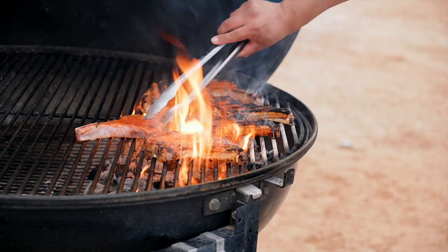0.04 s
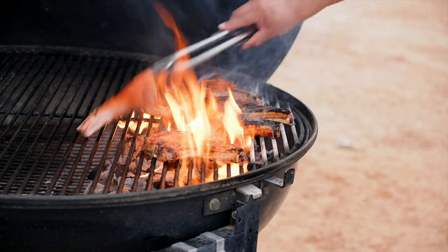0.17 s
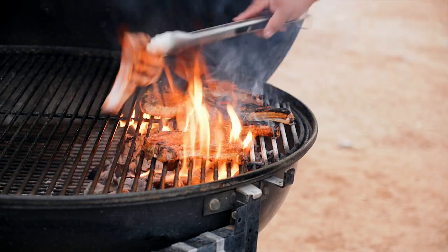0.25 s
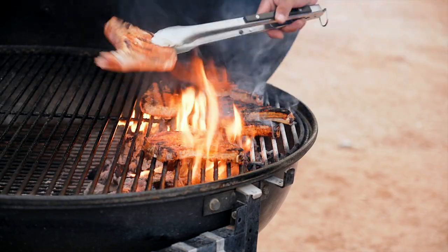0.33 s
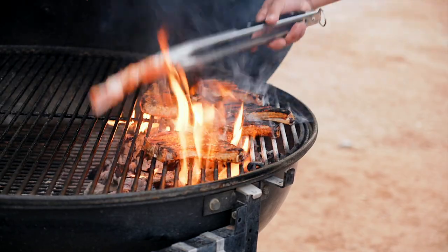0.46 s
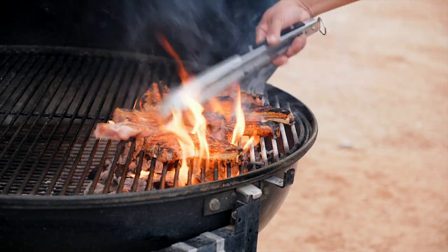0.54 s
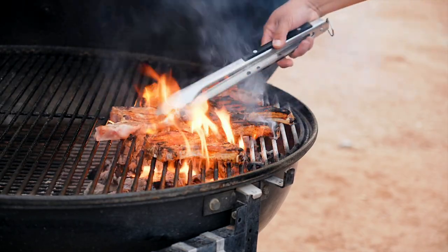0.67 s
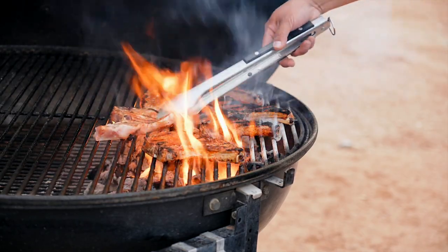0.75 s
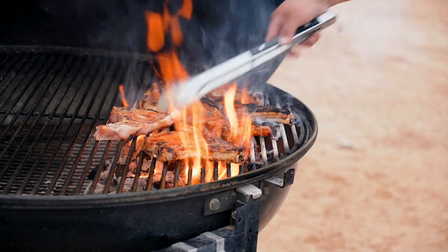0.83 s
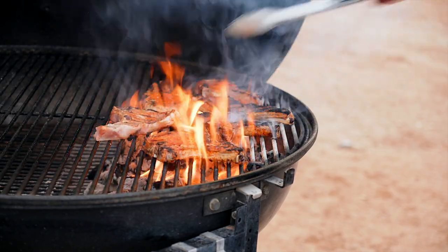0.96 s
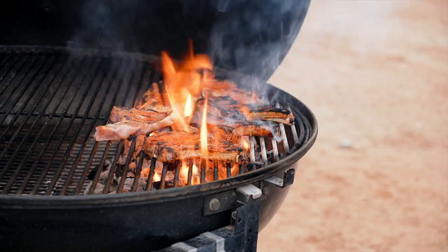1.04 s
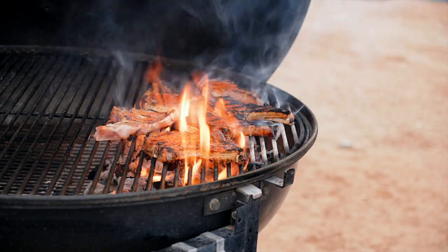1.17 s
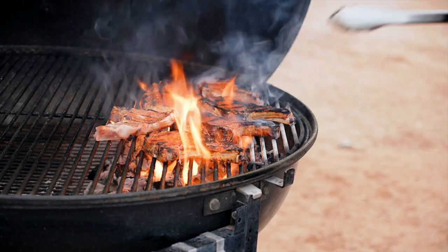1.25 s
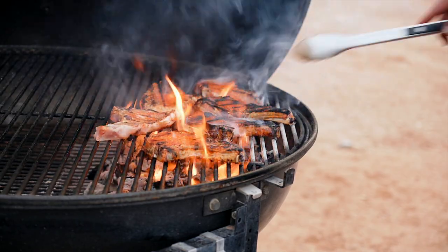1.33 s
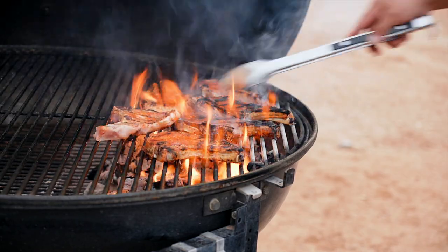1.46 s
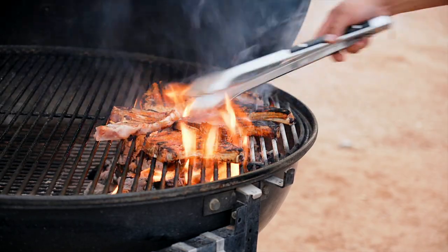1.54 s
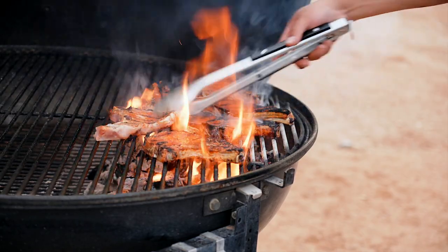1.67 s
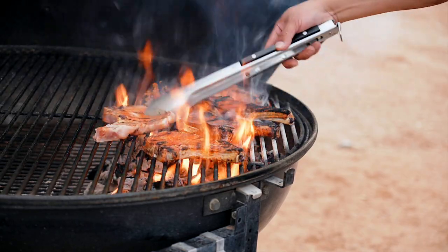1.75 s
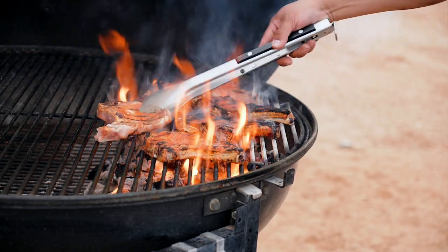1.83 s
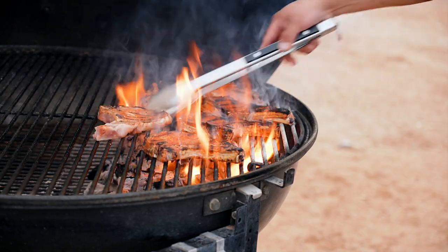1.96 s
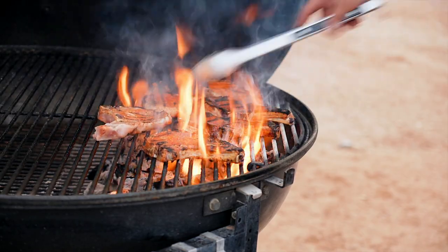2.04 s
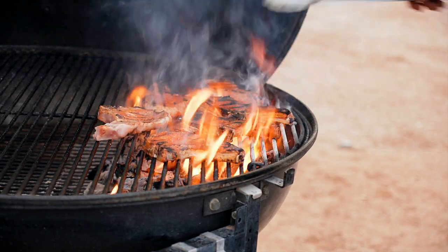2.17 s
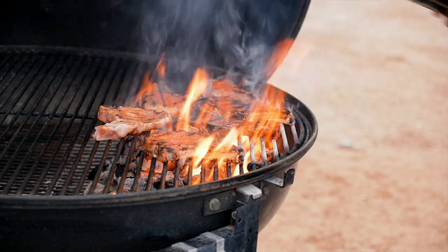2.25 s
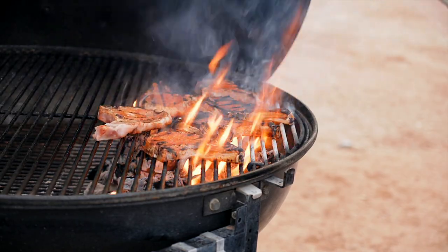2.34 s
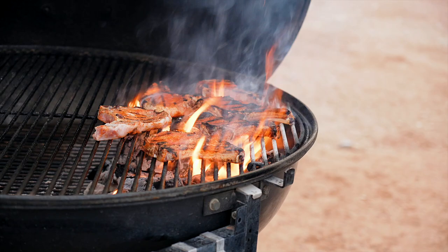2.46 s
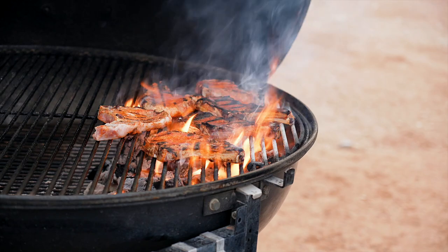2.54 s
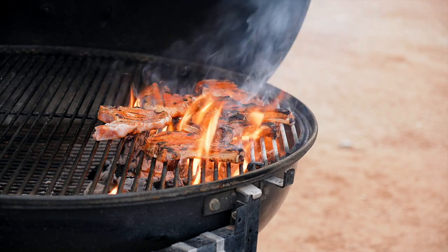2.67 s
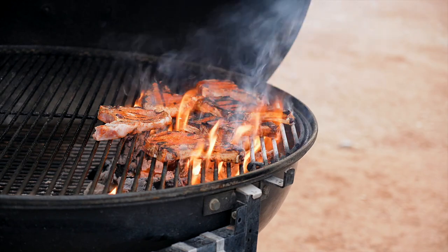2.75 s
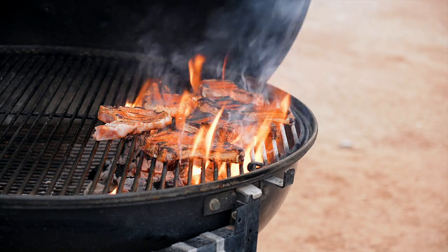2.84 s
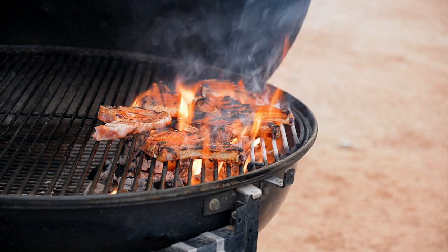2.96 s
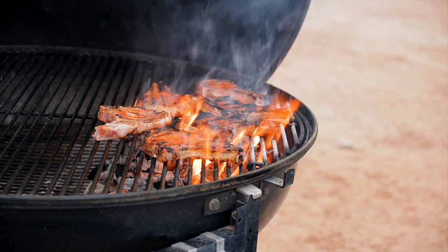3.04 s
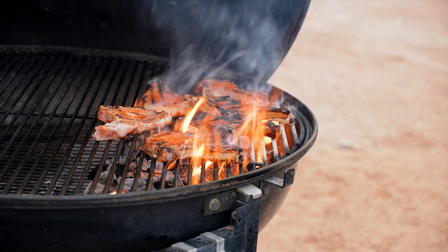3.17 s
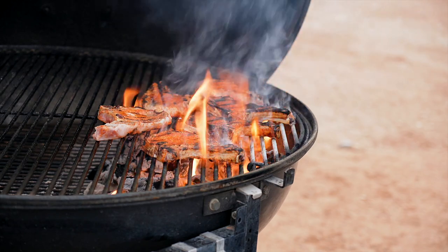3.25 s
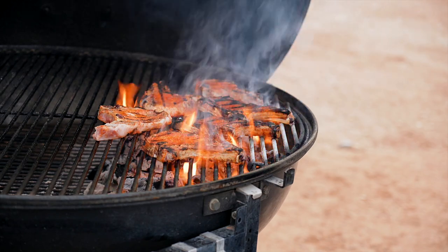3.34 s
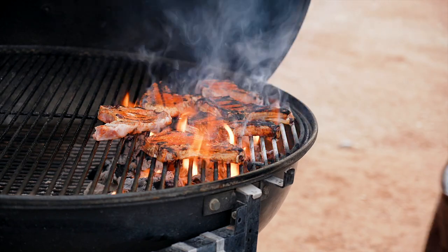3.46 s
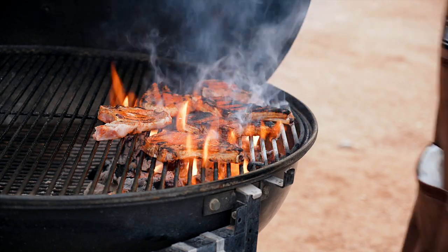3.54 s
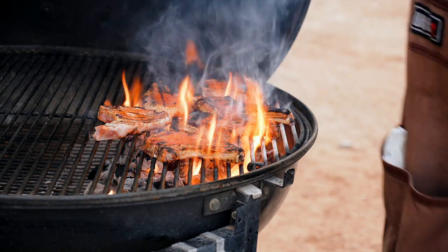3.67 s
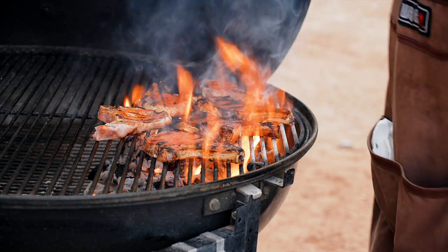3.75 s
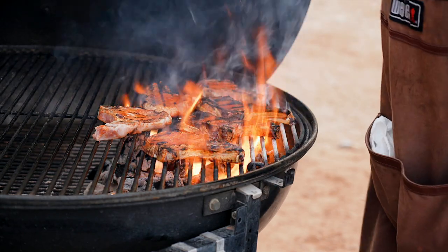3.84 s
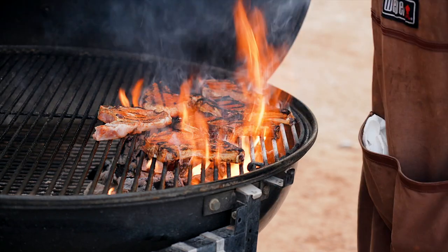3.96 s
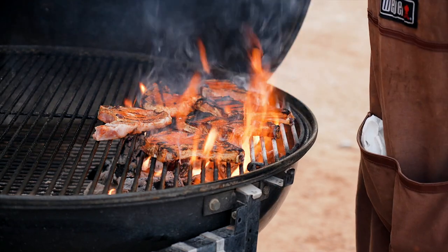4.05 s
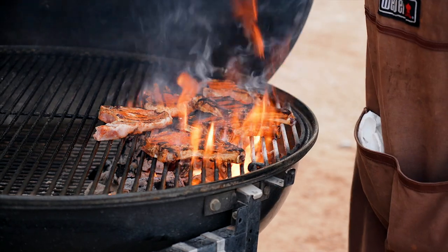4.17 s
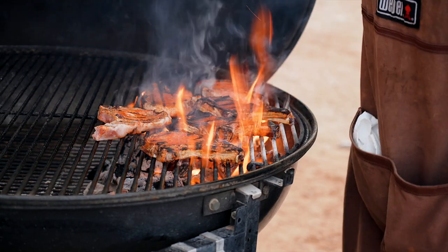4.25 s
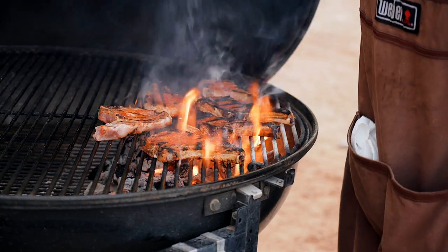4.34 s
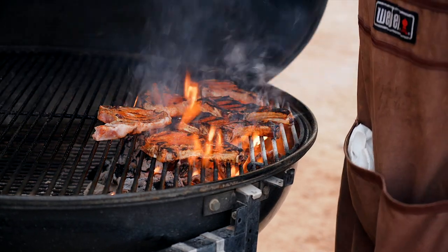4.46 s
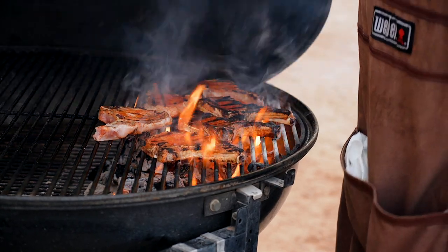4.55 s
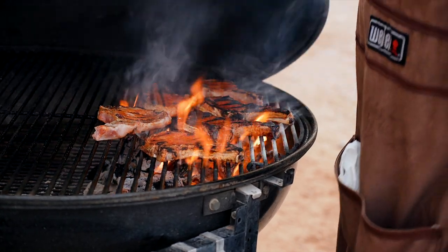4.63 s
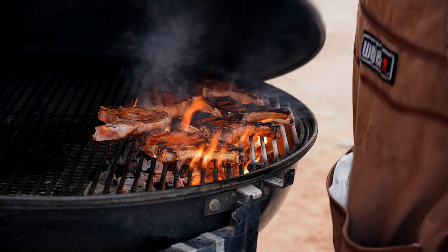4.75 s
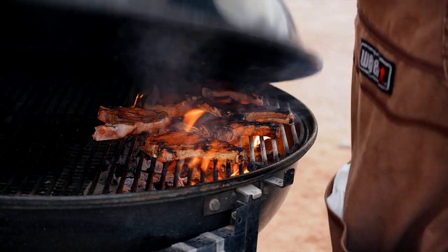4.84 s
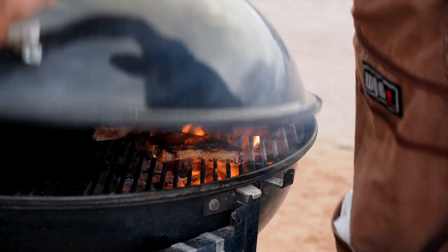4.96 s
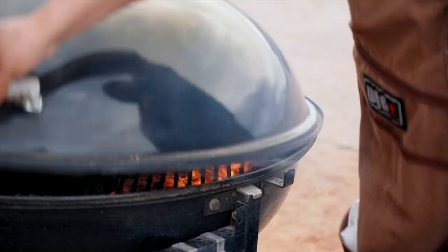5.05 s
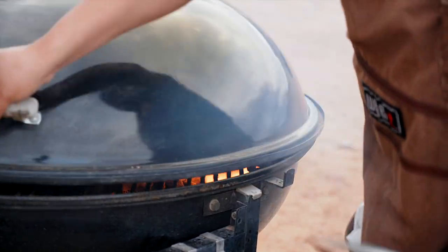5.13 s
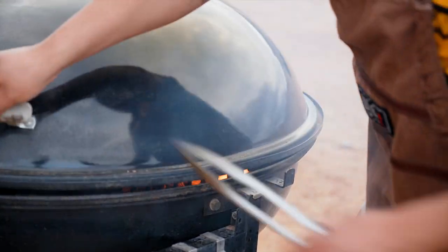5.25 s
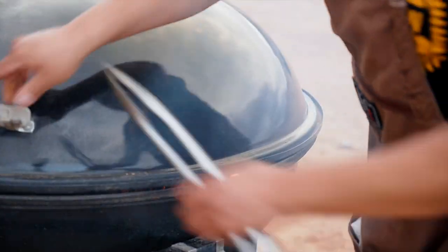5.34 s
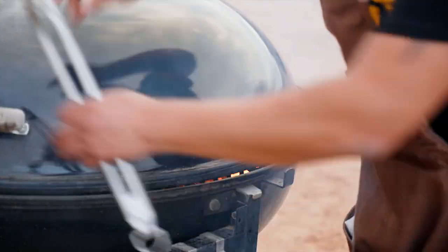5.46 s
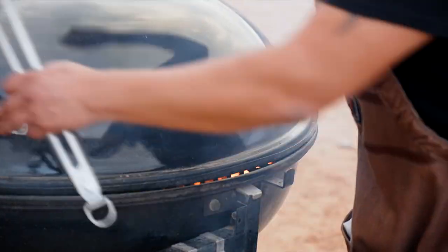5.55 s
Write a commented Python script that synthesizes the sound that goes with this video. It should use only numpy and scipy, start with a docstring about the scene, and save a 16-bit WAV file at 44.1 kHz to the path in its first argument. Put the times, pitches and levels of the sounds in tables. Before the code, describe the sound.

Steady bright sizzling outdoors with metal tong clicks and fat pops, ending in a heavy rattling lid clang and dull knocks.

```python
"""Outdoors at a steel kettle grill, one microphone: meat sizzles as flickering noise grains over a duller rustle,
wind presses on the microphone as low noise, and bumps and tongs ring the grate and tongs as struck modes.
Fat spits in short noise bursts. After four seconds knocks and low thumps shake the bowl, then the lid drags
off its rest with a rattling clang of jolts, slips and grit. As it comes down over the meat the sizzle
dies away, and last knocks and thumps sound on the shut bowl. No distances are computed."""
import sys
import numpy as np
from scipy import signal
from scipy.fft import rfft, irfft, next_fast_len
from scipy.io import wavfile
from scipy.ndimage import uniform_filter1d

SR = 44100
rng = np.random.default_rng(int(sys.argv[2]) if len(sys.argv) > 2 else 0)


def materialize(psi):
    """Save the field psi as 16-bit PCM at rate SR to the path in sys.argv[1].

    A 1-D psi becomes a single channel; in a 2-D psi each row is a channel.
    """
    bounded = np.clip(np.atleast_2d(psi).T, -1, 1)
    quanta = np.round(bounded * 32767).astype(np.int16)
    wavfile.write(sys.argv[1], SR, quanta)


N = 246957  # samples, 5.6 s

# Fire over time, sizzle before the lid lowers it: time_s, sizzle_db, rustle_db
FIRE_LEVELS = [(0.0, -45.5, -47), (0.37, -45.5, -48), (0.55, -45.5, -52), (0.79, -43, -46.5),
               (1.07, -43.5, -54), (1.4, -42, -53), (1.8, -43.5, -49), (2.2, -40, -48.5), (2.45, -44, -52),
               (3.1, -45, -53.5), (3.8, -44.5, -46.5), (4.15, -42.5, -49.5), (4.45, -44.5, -44),
               (4.95, -42, -48), (5.09, -42, -46.5), (5.3, -43, -48.5), (5.6, -42, -45.5)]
# Relative spectrum of fizzing fat: frequency_hz, level_db (per Hz)
SIZZLE_SPECTRUM = [(150, -9), (400, -12.5), (1000, -6), (2000, -5), (3300, -3), (5000, -2), (8600, -1),
                   (13500, 0), (16500, -19)]
# Relative spectrum of fire and handling rustle: frequency_hz, level_db (per Hz)
RUSTLE_SPECTRUM = [(70, -19), (120, -3.5), (260, 5), (400, -0.5), (600, 0.5), (1300, -2), (2500, -10),
                   (4000, -14), (7000, -46)]
# Fat bubbles bursting: start_s, snap_level_db, centre_hz
FAT_POPS = [(0.4476, -31, 3740), (0.713, -24.5, 7200), (0.753, -33, 9100), (0.851, -33, 8600),
            (2.119, -24, 8780), (2.6599, -30, 8730), (2.8404, -33, 4490), (3.1085, -31, 7960),
            (3.1335, -29, 6720), (3.1727, -28, 7410), (3.341, -30, 8590), (3.415, -28.5, 7870),
            (3.4822, -28, 8730), (3.5223, -30, 8820), (3.6, -28, 5780), (3.829, -30, 4530),
            (3.9, -26, 7770)]
POP_T60_S, POP_HALF_WIDTH_OCTAVES, SPRAY_OVER_SNAP_DB = 0.0049, 1.4, -8
# The lid comes down over the meat and the sizzle dies away under it
LOWER_S, MUFFLE_DB_PER_S = 4.645, 20

# Wind on the microphone over time: time_s, level_db
WIND_LEVELS = [(0.0, -37.5), (0.2, -41), (0.76, -34.5), (1.57, -40.5), (2.06, -55), (2.24, -40), (2.6, -42),
               (3.01, -48.5), (3.5, -55), (4.0, -50), (4.38, -45), (4.55, -51), (5.3, -52.5), (5.6, -49)]
# Relative spectrum of the wind: frequency_hz, level_db (per Hz)
WIND_SPECTRUM = [(4, -29), (8, 7.5), (18, 5), (30, -7.5), (60, -14), (90, -24.5), (150, -23.5), (260, -75),
                 (400, -80)]

# Bumps on the grate, the narrow ones heard as wavering, nearly pitched hums:
# start_s, level_db, centre_hz, rattle_t60_s, half_width_octaves, ring_db (over the bump)
GRATE_BUMPS = [(.001, -42.5, 490, 0.2, 0.39, -8), (.573, -44, 600, 0.35, 1.6, -12),
               (.604, -35.5, 690, 0.26, 1.75, -6), (.612, -31.5, 633, 0.3, 0.087, -36),
               (.637, -36.5, 624, 0.35, 1.3, -16), (1.104, -44, 1200, .086, .5, -30),
               (1.447, -28, 730, 0.097, 1.05, -27), (1.677, -40.5, 555, 0.18, 0.64, -10),
               (1.678, -34, 1394, 0.075, 0.035, -30), (1.951, -38, 454, .094, 2.2, -5),
               (2.0, -42.5, 676, 0.41, 0.062, -17), (2.069, -38.5, 1200, 0.039, 1.6, -24),
               (2.22, -42.5, 800, .11, 1.3, -13), (2.841, -44.5, 1080, 0.11, 0.39, -36),
               (3.136, -44, 700, 0.14, 1.3, -17), (3.413, -43.5, 321, .27, 0.14, -21)]
# Modes of the grate, relative: pitch_hz, level_db, t60_s
GRATE_MODES = [(350, -11, .25), (385, -9, .25), (470, -7, .25), (532, -4, .3), (550, -1, .3),
               (600, -2, .15), (700, -5, .15), (845, -7, .12), (1012, -9, .25), (1075, -9, .3),
               (1184, -9, .2), (1680, -12, .25)]
# The hoop takes up the bars' motion late: pitch_hz, level_db (relative), rise_s, t60_s
HOOP_MODE = (668, .5, .11, .55)

# Tongs snapping together or on the grate, and one sharp fat pop at 4.06 s:
# start_s, level_db, centre_hz, chatter_t60_s, half_width_octaves, ring_db (over the clink)
CLINKS_AND_POP = [(.109, -33.5, 5330, 0.03, 1.4, -18), (.192, -34, 3350, 0.14, 1.5, -20),
                  (.316, -39.5, 3100, 0.14, 1.8, -13), (.602, -35.5, 2950, 0.11, .6, -15),
                  (.99, -31, 3340, 0.044, 0.88, -12), (1.6705, -35, 2900, 0.099, 0.95, -30),
                  (2.3382, -19, 7000, 0.016, 2.4, -21), (2.3408, -17.5, 6440, 0.032, 1.5, -5),
                  (2.3569, -28, 6350, 0.036, 3.1, -2), (2.3685, -31.5, 6000, 0.048, 1.4, -3),
                  (2.735, -31.5, 4270, 0.09, 0.88, -9), (2.751, -37.5, 4200, 0.055, 0.68, -4),
                  (2.9768, -26.5, 4300, 0.047, 0.92, -23), (4.0605, -22.5, 5000, 0.0065, 0.94, -19),
                  (4.0807, -33, 3600, 0.029, 1.8, -16), (4.1506, -41, 3340, 0.046, 0.48, -10),
                  (4.2659, -28, 3870, 0.092, 0.7, -22), (5.114, -30, 3500, 0.043, 0.62, -21),
                  (5.349, -46.5, 5600, .05, 0.31, -6), (5.372, -45, 5100, 0.028, 0.76, -12)]
# Modes of the tongs, relative: pitch_hz, level_db, t60_s
TONG_MODES = [(1650, -8, .06), (2300, -6, .05), (2900, -8, .05), (3295, -1, .07), (3700, -7, .05),
              (4177, -2, .13), (4800, -6, .05), (5300, -2, .07), (6654, -9, .1), (7343, -8, .08),
              (7750, -5, .04), (8200, -5, .07), (9130, -6, .04), (11800, -12, .05), (13200, -12, .04)]

# Hand and lid knocking the bowl, first open, then shut:
# start_s, level_db, rattle_t60_s, ring_db (over the knock)
BOWL_KNOCKS = [(4.163, -34.5, 0.32, -17.5), (4.193, -41, 0.16, -17), (4.265, -29, 0.18, -13),
               (4.289, -38, 0.11, -32), (4.416, -35.5, 0.18, -14), (4.434, -40, 0.16, -18),
               (4.924, -48, 0.12, -2), (5.112, -24, 0.19, -8.5), (5.141, -32, 0.32, -8),
               (5.433, -45, 0.41, -15), (5.459, -40, 0.33, -8), (5.487, -30.5, 0.27, -18),
               (5.509, -38.5, 0.21, -3.5)]
KNOCK_CENTRE_HZ, KNOCK_HALF_WIDTH_OCTAVES = 696, 1.37
# Modes of the bowl, relative: pitch_hz, level_db, t60_s
BOWL_MODES = [(199, -2, .17), (240, -6, .3), (312, 0, .35), (458, -14, .4), (560, -6, .26), (610, -8, .3),
              (770, 1.5, .4), (826, -8, .3), (947, -9, .3), (1260, -9, .26), (1400, -10, .2),
              (1545, -13, .28), (1669, -9, .23), (1852, -12, .3), (2213, -12, .17), (2649, -7, .25)]

# Low thumps of the whole grill: start_s, level_db, pitch_hz, t60_s
GRILL_THUMPS = [(4.164, -25, 190, 0.052), (4.267, -25.5, 193, 0.02), (4.416, -14, 229.8, .033),
                (4.504, -6, 192, 0.04), (4.539, -8.5, 242, 0.039), (4.579, -26.5, 190, .091),
                (4.789, -42.5, 119, 0.37), (4.923, -43.5, 116, 0.55), (5.115, -13.5, 189, 0.041),
                (5.135, -31, 86.4, 0.15), (5.489, -14, 110, 0.043), (5.51, -23.5, 123, 0.058),
                (5.519, -32.5, 236, 0.4)]

# Lid dragged over its rest: time_s, force_db, grit_db (over the force)
DRAG_FORCE = [(4.505, -8.5, -25), (4.55, -8, -28), (4.569, -9, -20.5), (4.585, -8.5, -17.5),
              (4.625, -10.5, -28.5), (4.871, -30, -31.5), (4.895, -47, -38), (4.92, -78, -6)]
CLATTER_OVER_FORCE_DB, CLANG_OVER_FORCE_DB = -8.0, -10.5
# Relative spectrum of the lid's dense sheet modes: frequency_hz, level_db (per Hz)
CLATTER_SPECTRUM = [(60, -70), (120, -42), (200, -32), (300, -25), (420, -42), (600, 11), (900, -3),
                    (1600, 1.5), (2100, -7.5), (2800, -8.5), (4500, -34), (8000, -64)]
# Relative spectrum of the scraping grit: frequency_hz, level_db (per Hz)
GRIT_SPECTRUM = [(1500, -40), (2800, 0), (5500, -5), (9000, -12), (13000, -15), (16000, -22)]
# Clear modes of the lid, relative: pitch_hz, level_db, t60_s
LID_MODES = [(192, -16, .2), (315, -11, .3), (485, -10, .45), (543, -3, .4), (578, -2, .3),
             (615, -3.5, .45), (646, -4, .65), (665, -1, .55), (683, -2, .4), (717, -3, .4), (792, -8, .35),
             (819, -1.5, .45), (910, -12, .25), (1064, -14, .4), (1123, -12, .5), (1166, -11, .4),
             (1263, -11, .4), (1291, -9, .4), (1323, -7, .35), (1410, -13, .4), (1597, -6, .4),
             (1649, -6, .35), (1885, -12, .4), (2263, -13, .45), (2632, -14, .4), (2767, -15, .35),
             (2860, -17, .25), (3090, -16, .3), (3760, -24, .3), (4190, -25, .3)]
# The lid jolting as it slides off its rest: start_s, level_db, centre_hz
LID_JOLTS = [(4.502, -23, 575), (4.535, -22.5, 940), (4.544, -20, 810), (4.562, -21, 1220),
             (4.582, -15.5, 2000), (4.602, -25, 1250), (4.66, -24, 1400)]
JOLT_T60_S, JOLT_HALF_WIDTH_OCTAVES, JOLT_RING_DB = 0.028, 1.24, 5.5
# The hand steadies the lid and deadens it
GRIP_S, GRIP_DB_PER_S = 4.875, 112
# Tone of the whole lid drag, bass cut and a slight dip near 400 Hz: frequency_hz, gain_db
LID_DRAG_TONE = [(70, -30), (150, 0), (360, 0), (400, -6), (460, 0)]

# Treble colour of the microphone: frequency_hz, gain_db
MICROPHONE_RESPONSE = [(6500, -0.5), (8600, 3), (9600, -0.5), (10600, -6), (12000, -2.5), (13500, -4),
                       (15000, 2)]
RECORDER_EDGE_HZ = 15900


def gain_of(db):
    """Decibels to a factor."""
    return 10 ** (np.asarray(db) / 20)


def evened(x):
    """Scales to rms 1."""
    return x / np.sqrt(np.mean(x ** 2) + 1e-20)


def curve(rows, column, outside_db=None):
    """One column of a table at every sample."""
    rows = np.array(rows)
    return np.interp(np.arange(N) / SR, rows[:, 0], rows[:, column], outside_db, outside_db)


def fall_after(start_s, db_per_s):
    """A steady fall in decibels from a given moment, as a factor."""
    return gain_of(-db_per_s * np.maximum(np.arange(N) / SR - start_s, 0))


def shaped(x, points):
    """Passes x through a (Hz, dB) response, straight over log frequency."""
    size = next_fast_len(len(x))
    point_hz, point_db = np.transpose(points)
    hz = np.fft.rfftfreq(size, 1 / SR)
    response_db = np.interp(np.log(hz + 1), np.log(point_hz + 1), point_db)
    return irfft(rfft(x, size) * gain_of(response_db), size)[:len(x)]


def coloured(x, points):
    """Noise shaped by a relative spectrum, rms 1."""
    return evened(shaped(x, points))


def wander(per_s):
    """Slow random drift of rms 1: noise smoothed twice over 1/per_s seconds."""
    window = int(SR / per_s)
    once = uniform_filter1d(rng.standard_normal(N), window)
    return evened(uniform_filter1d(once, window))


def grains(spread_db, share, most):
    """Noise in which a share of the samples are clicks of very uneven size."""
    sizes = gain_of(spread_db * np.minimum(rng.exponential(1, N), most))
    clicks = sizes * (rng.random(N) < share)
    return rng.standard_normal(N) * (1 + clicks)


def ring(force, modes, late=None):
    """A struck body: the force convolved with dying sines of energy 1 in all."""
    t = np.arange(SR) / SR
    body = sum(gain_of(db - 60 * t / t60) * np.sin(2 * np.pi * hz * t) for hz, db, t60 in modes)
    if late:
        hz, db, rise, t60 = late
        swell = 1 - np.exp(-(t / rise) ** 2)
        body = body + swell * gain_of(db - 60 * t / t60) * np.sin(2 * np.pi * hz * t)
    return signal.oaconvolve(force, body / np.linalg.norm(body))[:N]


def bursts(rows):
    """Rows (s, dB, Hz, t60, octaves) as dying noise, and as single clicks of the same colour and energy."""
    t = np.arange(SR // 4) / SR
    out = np.zeros((2, len(rows), N + SR), np.float32)
    noise = rng.standard_normal((len(rows), len(t)))
    for k, (s, db, hz, t60, octaves) in enumerate(rows):
        edges = np.clip(hz * 2 ** (max(octaves, .03) * np.array([-1, 1])), 30, .45 * SR)
        band = signal.butter(2, edges, "band", fs=SR, output="sos")
        decay = gain_of(-60 * t / t60)
        pair = signal.sosfilt(band, [noise[k] * decay, t == 0])
        # both take the energy of the bare decay
        pair *= np.linalg.norm(decay) / np.linalg.norm(pair, axis=1)[:, None]
        out[:, k, round(s * SR):][:, :len(t)] = gain_of(db) * pair
    return out[..., :N]


def knocks(rows, modes, late=None):
    """A dying noise burst for each row; a click and that burst set the modes ringing."""
    rattle, blow = bursts([row[:5] for row in rows])
    ring_gains = gain_of([row[5] for row in rows])
    force = ring_gains @ (blow + .5 * rattle)
    return rattle.sum(0) + ring(force, modes, late)


def fire():
    """Tiny bubbles fizz in flickering clumps over a duller rustle; larger ones snap and spray."""
    fizz = coloured(grains(5.15, .015, 3.7) * gain_of(1.0 * wander(53)), SIZZLE_SPECTRUM)
    rustle = coloured(grains(4.7, 0.0081, 9.7) * gain_of(2.56 * wander(27.5)), RUSTLE_SPECTRUM)
    pops = [(s, db, hz, POP_T60_S, POP_HALF_WIDTH_OCTAVES) for s, db, hz in FAT_POPS]
    spray, snap = bursts(pops).sum(1)
    sizzle = gain_of(curve(FIRE_LEVELS, 1)) * fall_after(LOWER_S, MUFFLE_DB_PER_S) * fizz
    return sizzle + gain_of(curve(FIRE_LEVELS, 2)) * rustle + snap + gain_of(SPRAY_OVER_SNAP_DB) * spray


def wind():
    """Lumpy pressure on the microphone: low noise whose level rises and falls."""
    return gain_of(curve(WIND_LEVELS, 1)) * coloured(rng.standard_normal(N), WIND_SPECTRUM)


def grate_bumps():
    """Bumps rattle or hum and ring the bars, and the hoop swells after them."""
    return knocks(GRATE_BUMPS, GRATE_MODES, HOOP_MODE)


def tong_clinks_and_pop():
    """Tongs chatter at the contact and ring in bright modes; one sharp fat pop is voiced the same way."""
    return knocks(CLINKS_AND_POP, TONG_MODES)


def bowl_knocks():
    """Hand and lid rattle against the bowl and set its modes ringing."""
    rows = [(s, db, KNOCK_CENTRE_HZ, t60, KNOCK_HALF_WIDTH_OCTAVES, ring_db)
            for s, db, t60, ring_db in BOWL_KNOCKS]
    return knocks(rows, BOWL_MODES)


def thumps():
    """Dying low sines with a soft start, high-passed an octave below their pitch."""
    t = np.arange(SR // 2) / SR
    out = np.zeros(N + SR)
    for s, db, hz, t60 in GRILL_THUMPS:
        swing = gain_of(db - 60 * t / t60) * np.tanh(4.8 * hz * t) * np.sin(2 * np.pi * hz * t)
        high_pass = signal.butter(2, hz / 2, "high", fs=SR)
        out[round(s * SR):][:len(t)] += signal.lfilter(*high_pass, swing)
    return out[:N]


def lid_drag():
    """Jolts and uneven slips shake the lid's clear modes and its dense sheet clatter; grit scrapes on top."""
    # silent before and after the drag; smoothed over 60 samples
    force = gain_of(uniform_filter1d(curve(DRAG_FORCE, 1, -120), size=60))
    slips = evened(grains(3.2, 0.006, 2.4) * gain_of(0.83 * wander(110)))
    clatter = gain_of(CLATTER_OVER_FORCE_DB) * force * coloured(slips, CLATTER_SPECTRUM)
    grit = force * gain_of(curve(DRAG_FORCE, 2)) * coloured(slips, GRIT_SPECTRUM)
    jolts = [(*row, JOLT_T60_S, JOLT_HALF_WIDTH_OCTAVES, JOLT_RING_DB) for row in LID_JOLTS]
    clang = gain_of(CLANG_OVER_FORCE_DB) * ring(force * slips, LID_MODES) + knocks(jolts, LID_MODES)
    deadened = fall_after(GRIP_S, GRIP_DB_PER_S) * clang
    return shaped(deadened + clatter + grit, LID_DRAG_TONE)


def scene():
    """All sources at the one microphone."""
    steel = grate_bumps() + tong_clinks_and_pop() + bowl_knocks()
    return (fire() + wind() + steel + thumps() + lid_drag())[None]


def record(dry):
    """The microphone's treble colour, then the recorder's band limit."""
    low_pass = signal.firwin(511, RECORDER_EDGE_HZ, window=("kaiser", 9), fs=SR)
    return signal.oaconvolve(shaped(dry[0], MICROPHONE_RESPONSE), low_pass, "same")[None]


dry = scene()
out = record(dry)
materialize(out)
```